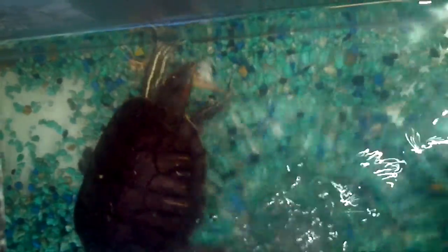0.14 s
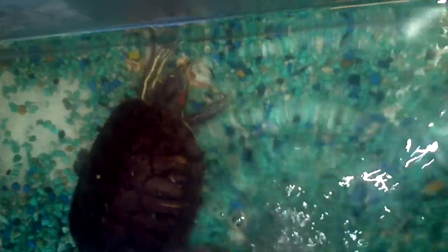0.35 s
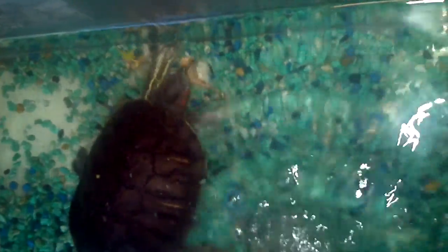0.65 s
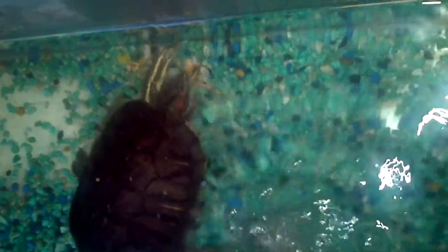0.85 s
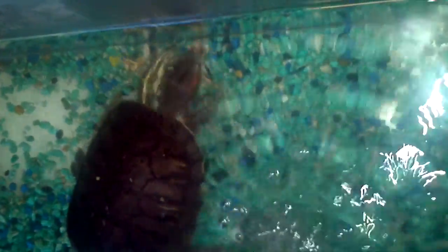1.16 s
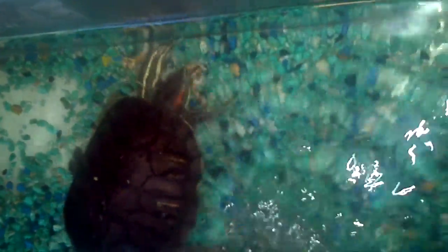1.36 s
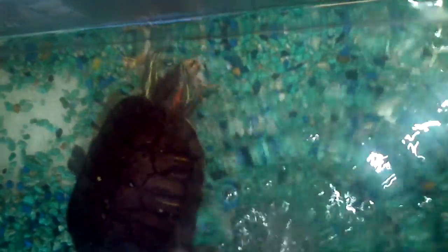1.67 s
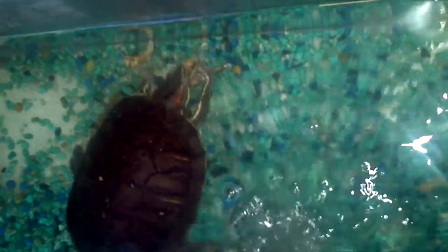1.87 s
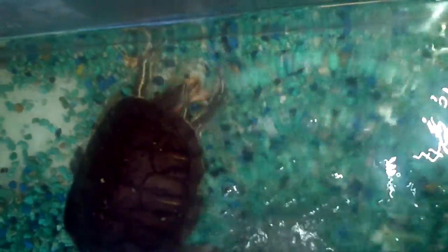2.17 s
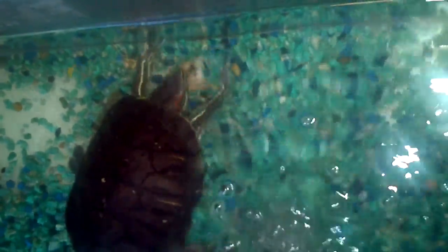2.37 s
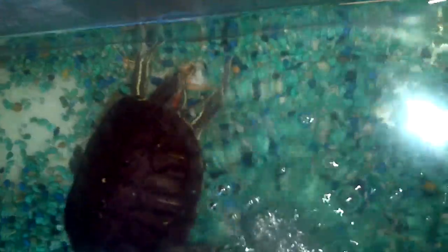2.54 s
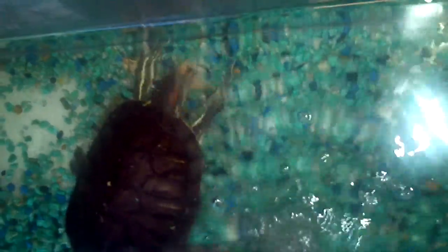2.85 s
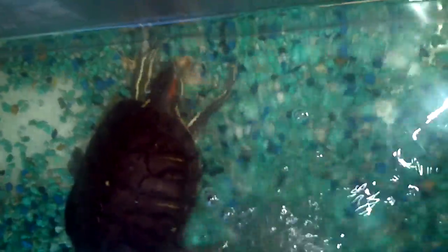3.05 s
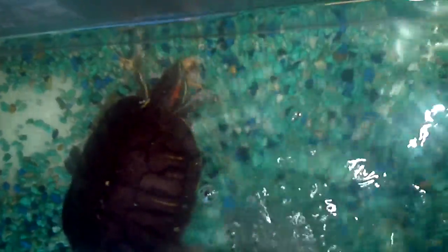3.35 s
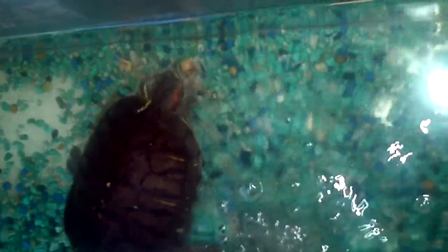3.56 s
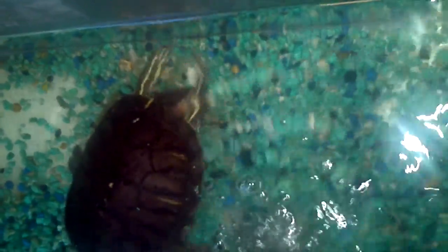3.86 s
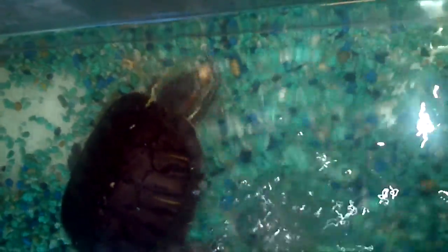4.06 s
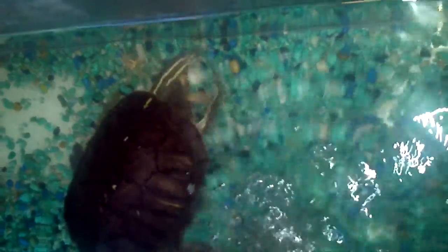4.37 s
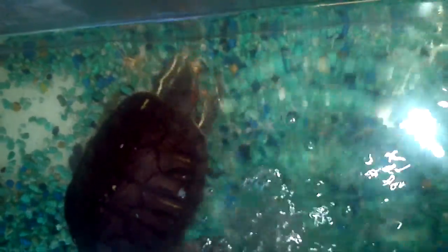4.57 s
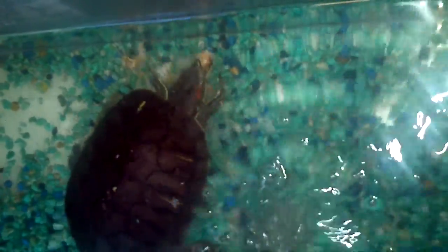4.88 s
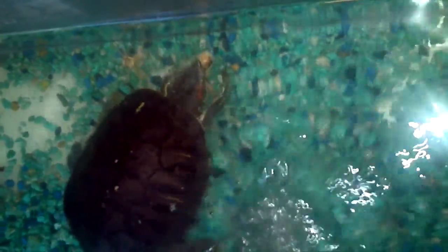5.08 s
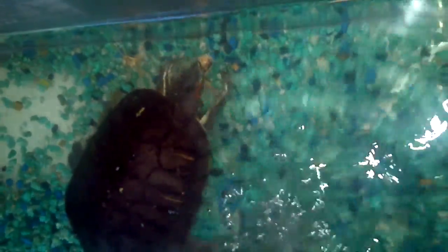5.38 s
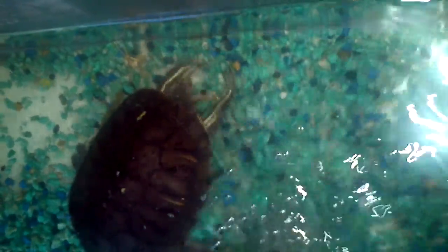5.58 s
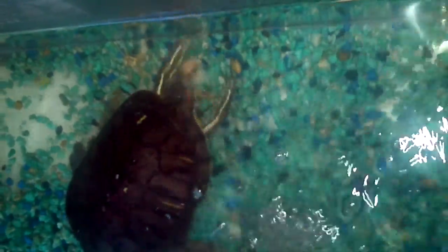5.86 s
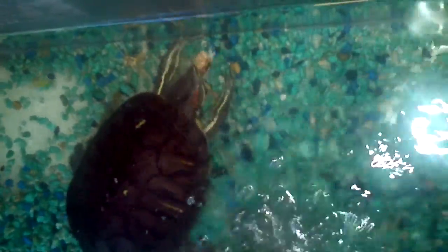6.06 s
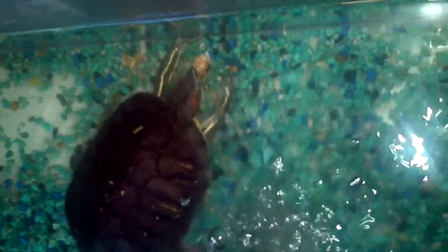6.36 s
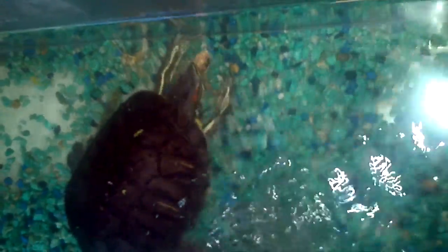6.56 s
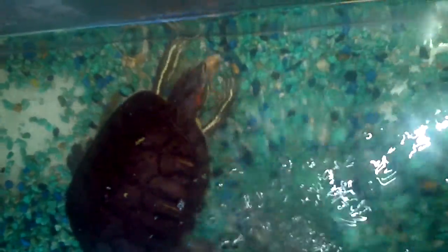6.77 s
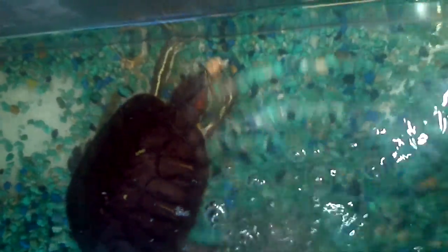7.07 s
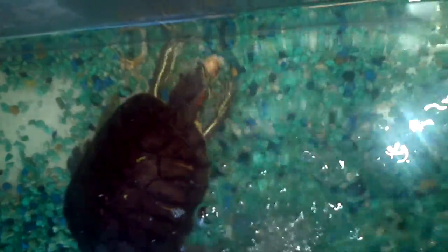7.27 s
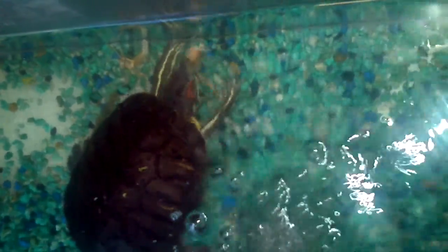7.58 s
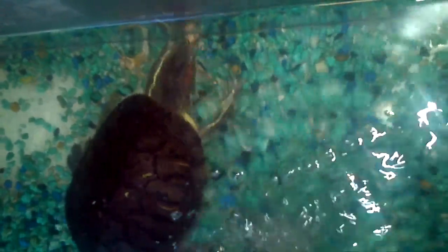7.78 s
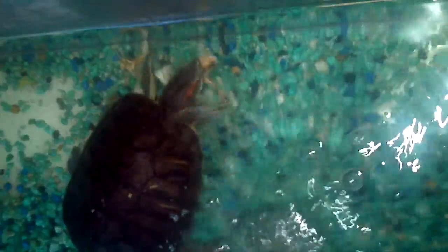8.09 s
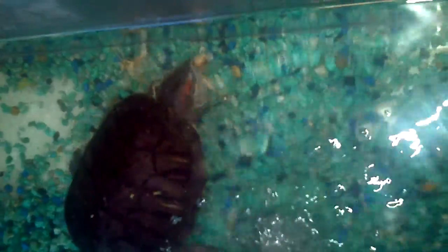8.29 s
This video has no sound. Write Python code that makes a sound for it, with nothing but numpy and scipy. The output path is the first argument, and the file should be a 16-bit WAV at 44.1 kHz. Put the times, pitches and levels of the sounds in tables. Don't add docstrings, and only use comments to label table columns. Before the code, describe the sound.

Aquarium water bubbles close up, with bright snapping pops, a fine crackling fizz, hollow gulps and a faint low pump hum underneath.

```python
import sys
import numpy as np
from scipy import signal
from scipy.fft import next_fast_len
from scipy.io import wavfile
from scipy.ndimage import uniform_filter1d

SR = 44100
rng = np.random.default_rng(int(sys.argv[2]) if len(sys.argv) > 2 else 0)


def log_audio(samples):
    frames = np.atleast_2d(samples).T
    limited = np.clip(frames, -1, 1)
    pcm = np.round(limited * 32767).astype(np.int16)
    wavfile.write(sys.argv[1], SR, pcm)


def ratio(d):
    e = np.asarray(d, float) / 20
    return 10 ** e


N = 371763

# frequency in Hz, level in dB.
FIZZ_SPECTRUM = [(2000, -15), (3500, -11.5), (4900, -12), (5700, -2.5), (7000, -4.5), (8200, -3.5),
                 (10000, -9), (11200, -6), (15500, -8)]
SPOT_DELAYS = [.00005, 0.000305, -0.00012]
EDGE_HZ = 15800


def evened(x):
    return x / np.sqrt(np.mean(x ** 2) + 1e-20)


def read(points, hz):
    f, value = np.transpose(points)
    return np.interp(np.log(hz + 1), np.log(f + 1), value)


def coloured(x, points):
    log_gain = np.log(ratio(read(points, abs(np.fft.fftfreq(4096, 1 / SR)))))
    taps = np.fft.ifft(np.exp(np.conj(signal.hilbert(log_gain)))).real[:1024]
    return signal.oaconvolve(x, taps[None], axes=1)[:, :N]


def add(mix, s, sound):
    part = mix[max(round(s * SR), 0):][:len(sound)]
    part += sound[:len(part)]


def sized(rows, hz, spread):
    return [(s, db, hz * (1 + spread * rng.standard_normal())) for s, db in rows]


def bubble(hz, cycles, glide, rise):
    u = np.arange(int(8 * cycles * SR / hz)) * hz / SR / cycles
    envelope = (1 - np.exp(-u / rise)) * np.exp(-u)
    wave = envelope * np.sin(2 * np.pi * cycles * u * (1 + glide * u))
    return wave / abs(wave).max()


def swarm(lo_hz, hi_hz, cycles, glide, per_s, spread_db, clump_db, clumps_per_s, count=24):
    slow = signal.butter(2, clumps_per_s, fs=SR, output="sos")
    clump = evened(signal.sosfilt(slow, rng.standard_normal((5, N))))
    clump = ratio(clump_db * np.minimum(0.5 * clump[-1] + 1.15 * clump[:-1], 1.6))
    level = ratio(spread_db * np.minimum(rng.exponential(1, N), 3.1))
    level = level * (rng.random(N) < per_s / SR)
    kind = rng.integers(0, count, N)
    spot = rng.integers(0, len(SPOT_DELAYS), N)
    out = np.zeros(len(SPOT_DELAYS) * N)
    for k, hz in enumerate(np.geomspace(lo_hz, hi_hz, count)):
        at = np.flatnonzero(level * (kind == k))
        wave = bubble(hz, cycles, glide, 0.16)
        where = (spot[at] * N + at)[:, None] + np.arange(len(wave))
        sounds = np.outer(level[at] * clump[k * len(clump) // count, at], wave)
        out += np.bincount(where.ravel(), sounds.ravel(), len(out))[:len(out)]
    return out.reshape(-1, N)


def flow(column):
    # time in seconds, fizz level in dB, churn level in dB.
    air_flow = [(0.0, -43, -44.5), (0.54, -39, -43), (1.17, -40.5, -45.5), (1.71, -43, -43.5),
                (2.84, -39.5, -43), (3.1, -41, -44), (6.2, -42.5, -45.5), (6.71, -38.5, -45.5),
                (7.18, -43, -42.5), (8.43, -39, -42.5)]
    rows = np.transpose(air_flow)
    return ratio(np.interp(np.arange(N) / SR, rows[0], rows[column]))


def hollow(x):
    # frequency in Hz, width in Hz, level in dB.
    air_modes = [(381.6, 48, 1.5), (430, 33, -4.5), (504.5, 14, -9.5), (675, 44.6, 1), (934, 72, -4.5),
                 (1100, 112, 2), (1700, 147, 7), (1816, 20, -3), (2050, 19, 2.5), (2326, 61, 7),
                 (2590, 20, 9.5)]
    out = 0
    for hz, width, db in air_modes:
        mode = signal.lfilter(*signal.iirpeak(hz, hz / width, SR), x)
        out = out + ratio(db) * mode * np.sqrt(40 / width)
    return out


def rumble():
    # frequency in Hz, level in dB.
    murmur_spectrum = [(30, -21), (70, -18.5), (100, -11.5), (160, -6), (230, -12.5), (400, -19.5)]
    noise = rng.standard_normal((3, N))
    opposed = 1.2 * np.array([[1], [-1]]) * noise[2]
    return ratio(-52.5) * evened(coloured(noise[:2] + opposed, murmur_spectrum))


def drone():
    noise = signal.lfilter(*signal.iirpeak(242, 9.0, SR), rng.standard_normal(N))
    noise = signal.lfilter(*signal.iirpeak(250, 3.0, SR), noise)
    shake = signal.hilbert(noise, next_fast_len(N))[:N]
    lead_rad = np.array([[.9], [0]])
    return ratio(-49.5) * evened((shake * np.exp(1j * lead_rad)).real)


def pump():
    # nominal frequency in Hz, level in dB, lead of the left port in radians.
    hum_lines = [(120, -65, 1.98), (180, -49.5, 2.15), (240, -53.5, 0.92), (300, -65.5, 0.4)]
    t, out = np.arange(N) / SR, np.zeros((2, N))
    for hz, db, lead in hum_lines:
        waver = sum(np.sin(2 * np.pi * (f * t + rng.random())) for f in np.geomspace(.3, 6, 8)) / 2
        phase = 2 * np.pi * round(hz / 60) * 60.03 * t + np.array([[lead], [0]])
        out += ratio(db + 4.5 + 0.31 * waver) * np.sin(phase)
    return out


def churn():
    # frequency in Hz, level in dB.
    water_spectrum = [(40, -39), (110, 12.5), (200, -19), (310, -20), (600, -9.5), (1200, -5), (2000, 2),
                      (3500, -69.5), (6000, 1.5)]
    drive = evened(swarm(330.2, 3492, 7.32, 0.0446, 600, 3.2, 1.55, 30.0, count=16))
    drive = drive + 0.047 * rng.standard_normal(drive.shape)
    resonant = ratio(-5.5) * evened(hollow(drive))
    plain = ratio(-14.5) * evened(coloured(drive, water_spectrum))
    return flow(column=2) * (resonant + plain)


def fizz():
    tiny = swarm(2280, 15260, 3.9, 0.026, 5000, 6.7, 3.46, 32)
    return flow(column=1) * ratio(-3.0) * evened(coloured(tiny, FIZZ_SPECTRUM))


def gulps():
    # start in seconds,
    # peak in dB, pitch in Hz.
    large, soft_large, more_others = [(.118, -31.5, 1340), (.716, -33.5, 390), (1.031, -31.5, 1837),
                                 (1.299, -31, 1750), (1.617, -26.5, 1780), (1.636, -30, 1664),
                                 (2.06, -23, 2080), (2.319, -34, 830), (2.503, -28.5, 420),
                                 (2.665, -32, 2050), (2.796, -31, 2590), (3.416, -31, 470),
                                 (3.464, -35.5, 1700), (3.643, -30, 1760), (3.881, -31.5, 1645),
                                 (4.971, -40, 1660), (5.58, -30.5, 2380), (6.084, -33, 1650),
                                 (6.826, -31.5, 1760), (7.04, -34, 1730), (7.151, -32, 428),
                                 (7.263, -36, 400)], [(0.1196, -41, 720), (0.336, -38, 430), (0.3364, -27.5, 599),
                                                (0.4147, -33.5, 1080), (0.6284, -36, 400),
                                                (0.462, -32, 442), (4.557, -37, 1690), (0.8398, -36, 740),
                                                (0.8407, -30.5, 1050), (0.8913, -30, 1100),
                                                (1.0475, -33, 775), (1.1766, -38, 418), (1.185, -35, 690),
                                                (1.2981, -33, 1130), (1.4452, -40.5, 432),
                                                (1.4458, -26.5, 640), (1.501, -36.5, 640),
                                                (1.6525, -37, 982), (1.8864, -36, 670), (3.385, -32, 1400),
                                                (2.1613, -30, 623), (2.5032, -31.5, 700),
                                                (2.7435, -38, 1140), (3.016, -43, 387), (3.1593, -35, 646),
                                                (3.2318, -40, 1140), (3.4184, -34, 984), (3.584, -34, 1100),
                                                (3.7706, -35, 715), (3.8799, -34, 1160), (4.0823, -34, 673),
                                                (4.3282, -45, 1064), (4.3274, -32, 460), (4.4021, -36, 790),
                                                (4.561, -23, 2380), (4.8109, -30, 985), (5.1087, -38, 1100),
                                                (5.253, -39, 1100), (5.4096, -36, 640), (5.8937, -35, 1143),
                                                (6.248, -38, 1110), (6.521, -35.5, 1270),
                                                (6.566, -37, 1100), (6.6898, -34.5, 1126),
                                                (6.7275, -39, 1070), (6.8287, -31, 1140),
                                                (6.8745, -39, 710), (6.9548, -41, 670), (7.1079, -38, 390),
                                                (7.1508, -31, 1000), (7.1838, -39, 1050),
                                                (7.6146, -43, 402), (7.6232, -39, 680),
                                                (7.6713, -30.5, 1085), (7.742, -38, 415),
                                                (7.742, -36, 1100), (7.8512, -39, 1074), (7.9663, -36, 394),
                                                (8.2341, -32.5, 650), (8.3061, -34, 430)], [(0.4337, -33, 1650), (0.5602, -37, 1760),
                                                               (0.7187, -31, 1760), (0.7573, -34, 1790),
                                                               (1.422, -32, 2300), (1.715, -31, 2500),
                                                               (1.784, -35, 1710), (2.1033, -29.5, 1860),
                                                               (2.195, -39, 1800), (2.2157, -36, 1750),
                                                               (2.2464, -35.5, 1760), (2.3052, -39, 1650),
                                                               (2.546, -29.5, 1460), (2.5937, -38, 1610),
                                                               (2.7298, -39.5, 1740), (3.292, -37, 1730),
                                                               (3.4086, -37, 1800), (4.2166, -38, 1820),
                                                               (4.275, -34, 1660), (4.662, -41, 1810),
                                                               (4.701, -36, 1840), (4.7275, -41, 1670),
                                                               (4.9355, -36.5, 1680), (5.3047, -34.5, 1730),
                                                               (5.5276, -31.5, 1710), (5.827, -39.5, 1670),
                                                               (6.127, -36.5, 1820), (6.1681, -40, 1660),
                                                               (6.1838, -35.5, 1730), (6.5093, -37, 1800),
                                                               (6.5472, -30.5, 1790), (6.5922, -40, 1570),
                                                               (6.941, -36, 1770), (7.081, -28.5, 2386),
                                                               (0.095, -34, 1470), (7.562, -33.5, 1830),
                                                               (7.6262, -36, 1660), (7.8163, -33, 2030),
                                                               (8.232, -37, 1650), (8.3088, -32, 1490)]
    # start in seconds, peak in dB.
    low_mode, mid_mode = [(.038, -29.5), (.28, -32), (.386, -39), (.442, -33), (.603, -31.5), (1.445, -62),
                          (1.792, -28), (1.995, -36.5), (2.16, -38), (2.438, -31.5), (3.55, -34.5),
                          (3.769, -34), (4.327, -27), (4.809, -35), (4.915, -26.5), (5.032, -35.5),
                          (5.196, -37), (5.401, -41), (5.675, -36.5), (6.044, -33), (6.872, -47),
                          (6.939, -38), (7.08, -36.5), (7.671, -21.5), (7.851, -35), (7.896, -35),
                          (7.962, -28), (8.052, -36.5), (8.113, -35), (8.305, -40)], [(.334, -34), (.631, -30), (.84, -45), (.883, -31),
                                             (1.048, -33), (1.187, -26), (1.357, -34.5), (2.231, -29.5),
                                             (2.341, -33), (2.626, -40), (2.841, -33), (3.016, -24),
                                             (3.049, -37), (3.232, -29.5), (3.822, -29), (4.557, -31.5),
                                             (4.753, -36), (5.228, -31), (5.301, -35), (5.496, -35),
                                             (6.154, -35), (6.296, -38), (6.476, -36.5), (6.69, -38),
                                             (6.759, -37), (7.374, -35.5), (7.533, -30.5), (7.774, -35),
                                             (8.211, -37.5)]
    spread = 0.032
    events = large + soft_large + more_others + sized(low_mode, 689, spread) + sized(mid_mode, 1080, spread)
    ring, knock = np.zeros((2, len(SPOT_DELAYS), N))
    for k, (s, db, hz) in enumerate(events):
        spot = k % len(SPOT_DELAYS)
        add(ring[spot], s, ratio(db - 8.5) * bubble(hz, 4.73 + hz / 300, 0.0323, 0.017))
        knock_gain = ratio(db + 1.5) * min(800 / hz, 1) ** 0.53
        add(knock[spot], s, knock_gain * bubble(1.34 * hz, 0.74, 0, 0.078))
    return ring + 0.6 * knock + ratio(10.0) * hollow(ring + knock)


def skins():
    # start in seconds, peak in dB, pitch in Hz, spray t60 in seconds.
    loudest = [(0.349, -14, 7950, 0.14), (.625, -17, 6650, 0.12), (0.791, -16, 8250, 0.024),
               (0.842, -15.5, 6830, 0.086), (0.878, -20.5, 6500, 0.13), (0.9845, -13, 7160, 0.055),
               (1.1676, -20.5, 6040, 0.11), (2.161, -16.5, 5470, 0.059), (2.238, -17.5, 6450, 0.082),
               (2.661, -14, 7200, 0.13), (2.727, -12, 7660, 0.022), (2.8052, -14, 7700, 0.075),
               (2.9858, -7.5, 7300, 0.065), (3.1352, -1.5, 7360, 0.0077), (3.4188, -14.5, 7800, 0.059),
               (3.5318, -14.5, 7200, 0.099), (3.6633, -17.5, 6200, 0.025), (3.908, -17.5, 6050, 0.12),
               (4.4996, -14, 6570, 0.013), (4.8099, -10, 6900, 0.0068), (4.989, -24, 6300, 0.035),
               (5.4013, -12.5, 8250, 0.15), (5.72, -12.5, 7000, 0.0068), (6.114, -19, 8240, 0.041),
               (6.233, -16.5, 8700, 0.021), (6.4072, -15.5, 7500, 0.032), (6.4788, -13.5, 8450, 0.038),
               (6.5266, -9, 6900, 0.0073), (7.1042, -14.5, 7470, 0.014), (7.672, -8.5, 7270, 0.024)]
    # start in seconds, peak in dB.
    snaps, soft = [(.021, -22.5), (.179, -45), (.1959, -44), (.2314, -48), (.2815, -23), (.5932, -22),
                   (.7158, -18.5), (.9309, -20.5), (1.1276, -14.5), (1.4077, -21), (1.6552, -22.5),
                   (1.705, -18), (1.9604, -20), (2.0999, -18), (2.2144, -21), (2.4118, -21.5),
                   (3.0906, -22), (3.3198, -19.5), (3.7233, -17), (3.9638, -20.5), (4.2632, -18.5),
                   (5.1367, -22), (5.4974, -22), (5.684, -18.5), (6.592, -21), (7.0544, -24.5),
                   (7.9628, -20), (8.0506, -18), (8.2062, -22), (8.3043, -50.5)], [(0.3055, -19), (0.332, -25), (0.4146, -26), (0.427, -21), (0.4534, -21),
                                  (1.004, -28), (1.1078, -34), (1.3395, -23.5), (1.3863, -22.5),
                                  (1.447, -23), (1.627, -23.5), (1.7705, -19), (1.792, -23), (1.842, -22),
                                  (2.5042, -22.5), (2.843, -18.5), (3.585, -21.5), (3.822, -28.5),
                                  (3.8437, -21), (4.327, -27), (4.8344, -23), (5.37, -27), (6.294, -21.5),
                                  (0.528, -22), (7.508, -25), (7.561, -30), (7.613, -25), (7.8223, -22.5),
                                  (8.028, -39), (8.1127, -27.5)]
    # start in seconds, peak in dB, pitch in Hz.
    strays, near_common, more_strays = [(0.0438, -23, 4600), (1.207, -22.5, 5330), (1.294, -21, 10340),
                               (2.0567, -35.5, 3920), (3.464, -22, 4100), (3.692, -20, 4200),
                               (4.029, -22, 10200), (4.442, -18.5, 8800), (4.772, -16.5, 9900),
                               (4.863, -20, 9500), (4.925, -27, 10400), (5.035, -11, 10200),
                               (5.101, -31, 4040), (5.1167, -20.5, 9800), (5.828, -23.5, 9000),
                               (5.941, -25, 4360), (6.013, -35, 4330), (6.295, -22, 3960),
                               (6.82, -29, 4000), (6.886, -20.5, 9400), (7.15, -19, 5200),
                               (7.395, -24.5, 5340), (7.7453, -20.5, 9200), (7.7787, -24.5, 10200),
                               (8.35, -27.5, 4030)], [(0.0408, -20.5, 7040), (0.1802, -21.5, 7300),
                                               (0.1934, -18.5, 6900), (0.2338, -21, 7000),
                                               (0.6278, -18.5, 7240), (0.648, -21, 7100),
                                               (0.7055, -24, 7850), (0.767, -47, 7000), (0.791, -33, 7100),
                                               (0.8804, -13.5, 7100), (0.934, -30, 7450),
                                               (1.0065, -23, 7000), (1.1089, -24, 7280), (1.265, -27, 7350),
                                               (1.408, -20.5, 7550), (1.685, -22, 6940),
                                               (2.2144, -19, 7360), (2.2313, -19, 7650), (2.44, -32, 7100),
                                               (2.454, -25, 6800), (2.4812, -27, 6400), (2.5846, -30, 7500),
                                               (2.7271, -19, 7260), (2.865, -22, 6960), (3.483, -23, 7300),
                                               (3.6652, -18, 6800), (3.937, -26, 7000), (3.999, -26, 6870),
                                               (4.035, -27, 7900), (4.1834, -22.5, 7000),
                                               (4.3423, -22, 7060), (4.362, -26, 7550), (4.5967, -23, 7580),
                                               (4.835, -23, 7400), (5.032, -15, 7300), (5.142, -21, 6750),
                                               (5.3206, -27, 6910), (5.422, -23, 6900), (5.513, -27, 7010),
                                               (5.6693, -27, 6800), (5.72, -19, 7100), (5.8834, -28, 7340),
                                               (6.086, -24.5, 7300), (6.162, -26, 7050),
                                               (6.2327, -22, 7450), (6.321, -28, 7140),
                                               (6.409, -16.5, 7700), (6.528, -31, 7350),
                                               (6.677, -24.5, 6650), (6.753, -26.5, 8200),
                                               (6.8221, -18, 7000), (6.8804, -33.5, 7450),
                                               (6.937, -25, 6960), (7.0594, -22, 6900), (7.3974, -26, 6850),
                                               (7.4595, -30, 7340), (7.846, -23, 6960), (7.8823, -24, 7070),
                                               (7.8955, -26, 7040), (8.3048, -21, 7700)], [(0.0423, -29, 12950), (0.106, -20.5, 13400),
                                                              (0.375, -29, 4570), (0.6172, -19, 13300),
                                                              (0.7922, -24, 9900), (0.8784, -26, 4540),
                                                              (1.1668, -23.5, 9400), (1.186, -32.5, 4060),
                                                              (1.295, -12, 9500), (1.293, -28, 4020),
                                                              (1.496, -25, 13400), (1.967, -27.5, 4140),
                                                              (2.2376, -26, 4530), (2.462, -24, 4500),
                                                              (2.647, -31.5, 4060), (2.7045, -29, 5110),
                                                              (2.706, -21, 13040), (2.901, -21, 9500),
                                                              (2.9225, -30.5, 4100), (2.928, -24, 9700),
                                                              (2.9894, -18.5, 10100), (3.6292, -29, 4100),
                                                              (3.911, -22, 10000), (3.9644, -25.5, 4900),
                                                              (3.971, -22, 13060), (4.15, -32.5, 4500),
                                                              (4.1753, -31, 4200), (4.7754, -20, 10650),
                                                              (4.9273, -38, 10300), (4.9881, -26, 3980),
                                                              (4.9963, -21, 9620), (5.0321, -30, 3780),
                                                              (5.038, -26, 10400), (5.139, -23, 10100),
                                                              (5.3997, -20.5, 4330), (5.497, -28, 3930),
                                                              (5.6656, -34, 3700), (5.709, -31, 9700),
                                                              (5.8465, -30.5, 4000), (6.008, -31, 4240),
                                                              (6.01, -20, 12800), (6.028, -26.5, 4260),
                                                              (6.1173, -27, 4500), (6.2287, -41, 3900),
                                                              (6.5934, -23, 13220), (6.593, -25.5, 10700),
                                                              (6.636, -26, 13400), (6.637, -21.5, 10700),
                                                              (6.822, -26, 4020), (6.889, -25, 12740),
                                                              (7.523, -21.5, 13180), (7.5595, -22.5, 4920),
                                                              (7.7346, -28.5, 4400), (7.8195, -27, 3550),
                                                              (8.0278, -24, 5230), (8.115, -18.5, 12900),
                                                              (8.1365, -28.5, 4080)]
    common_hz, common_spread, common_t60_s = 7070, 0.098, 0.067
    faint_per_s, faint_db, faint_spread_db, clear_s = 12, -37, 3, .035
    clear = snaps + soft + [row[:2] for row in loudest + strays + near_common + more_strays]
    beat = np.arange(0, N / SR, 1 / faint_per_s)
    chance = rng.standard_normal((200, 2))[:len(beat)]
    times = beat + 0.33 / faint_per_s * chance[:, 0]
    free = abs(times[:, None] - np.transpose(clear)[0]).min(1) > clear_s
    levels_db = np.where(free, faint_db + faint_spread_db * chance[:, 1], -90)
    common = sized(snaps + soft + list(zip(times, levels_db)), common_hz, common_spread)
    return loudest + [(*row, common_t60_s) for row in strays + near_common + more_strays + common]


def pops():
    rings, spray = np.zeros((2, len(SPOT_DELAYS), N))
    t, noise = np.arange(3000) / SR, rng.standard_normal((340, 3000))
    swell = 1 - np.exp(-t / 0.00019)
    for k, (s, db, hz, t60) in enumerate(skins()):
        spot = k % len(SPOT_DELAYS)
        fade = swell * ratio(db - 60 * t / np.clip(t60, .008, .075))
        near = evened(signal.lfilter(*signal.iirpeak(hz, 4.5, SR), noise[k]))
        burst = 0.89 * np.sqrt(swell) * ratio(db - 60 * t / 0.0027)
        add(rings[spot], s, ratio(db + 4.0) * bubble(hz, 2.97, 0.00047, 0.25))
        add(rings[spot], s, ratio(-10.5) * fade * near)
        add(spray[spot], s, ratio(-13.0) * (fade + burst))
    return rings + spray * evened(coloured(rng.standard_normal(spray.shape), FIZZ_SPECTRUM))


def tank(x, wet_db):
    # frequency in Hz, t60 in seconds.
    decay = [(300, 0.19), (1500, 0.054), (5000, 0.035), (9000, 0.038), (15000, 0.014)]
    length = SR // 8
    taps = np.zeros((len(x), 3, length))
    jitter = rng.integers(0, 20, (len(x), 3, (length - 61) // 20))
    at = np.arange(60, length - 20, 20) + jitter
    np.put_along_axis(taps, at, rng.choice([-1., 1.], at.shape), 2)
    hz, t, z = signal.stft(taps, SR, nperseg=256)
    own = (hz / (hz + 1500))[:, None] ** 1.25
    z = np.sqrt(1 - own ** 2) * z[:, 2:] + own * z[:, :2]
    z = z * ratio(-60 * t / read(decay, hz)[:, None])
    tail = signal.istft(z, SR, nperseg=256)[1]
    tail = signal.lfilter(*signal.butter(1, 900, "high", fs=SR), tail / np.linalg.norm(tail[0, 0]))
    k = np.arange(tail.shape[2]) - 16
    direct = np.array([[np.sinc(k), 0.72 * np.sinc(k - late_s * SR)] for late_s in SPOT_DELAYS])
    paths = direct + ratio(wet_db) * tail
    return signal.oaconvolve(x[:, None], paths, axes=2)[:, :, 16:N + 16].sum(0)


def widened(x):
    late = np.pad(x[::-1], ((0, 0), (15, 0)))[:, :N]
    return signal.lfilter(*signal.butter(2, 110, "high", fs=SR), x - 1.36 * late)


def scene():
    bubbles = pops() + gulps() + fizz() + churn()
    return widened(tank(bubbles, -4.5)) * ratio(-7.0) + pump() + drone() + rumble()


def levelled(x, knee_db, share, db_per_s):
    power_db = 10 * np.log10(abs(uniform_filter1d((x ** 2).mean(0), size=300)) + 1e-12)
    fall = np.arange(N) * db_per_s / SR
    over_db = np.maximum.accumulate(share * np.maximum(power_db - knee_db, 0) + fall) - fall
    return x / ratio(uniform_filter1d(over_db, size=1500, origin=749))


def thrifty(x, under_db, faint_db, grain_db, jump):
    mid_side = np.array([x[0] + x[1], x[0] - x[1]]) / 2
    z = signal.stft(mid_side, window="cosine", nperseg=2048, noverlap=1024)[2][:, :1024]
    power = (abs(z) ** 2).reshape(2, 64, 16, -1).mean(2)
    band_hz = (np.arange(64)[:, None] + .5) * SR / 128
    short = (np.diff(x[0], prepend=0)[:N // 128 * 128] ** 2).reshape(-1, 128).mean(1)
    sudden = short > jump * uniform_filter1d(short, size=9, origin=4)
    attack = np.minimum(12 * uniform_filter1d(1. * sudden, size=5, origin=1), 1)
    attack = np.interp(np.arange(N) / 128, np.arange(len(short)), attack)
    loudest = power[:, 15:25].max(0).mean(0)
    luck = ratio(3 * rng.standard_normal(power.shape)) ** 2
    extra_db = np.interp(band_hz, [2450, 2800, 3400, 3900, 9500, 11000], [0.3, 9, 9, 1.5, 1.5, 2.5])
    masked = power.max(0) * ratio(under_db + extra_db) ** 2
    weak = power < luck * np.maximum(masked, loudest * ratio(faint_db) ** 2)
    dropped = np.repeat(weak & (band_hz > 1400) | (band_hz > EDGE_HZ), 16, 1)
    grain = np.repeat(power.max(0) ** .5 * ratio(grain_db) * weak, 16, 1)
    grain = grain * np.exp(2j * np.pi * rng.random(z.shape))
    parts = np.pad(np.array([z * ~dropped, (z + grain) * dropped]), ((0, 0), (0, 0), (0, 1), (0, 0)))
    kept, lost = signal.istft(parts, window="cosine", nperseg=2048, noverlap=1024)[1][:, :, :N]
    mid, side = kept + attack * lost
    return np.array([mid + side, mid - side])


def band_limit(x):
    return signal.sosfilt(signal.butter(12, 16980, fs=SR, output="sos"), x)


def record(dry):
    edge = signal.firwin(101, EDGE_HZ, window=("kaiser", 2.2), fs=SR)
    rolled = signal.oaconvolve(levelled(dry, -24.0, 0.4, 2.14), edge[None], "same")
    finished = thrifty(rolled, under_db=-10.5, faint_db=-20, grain_db=-18.0, jump=4.8)
    return band_limit(finished)


dry = scene()
out = record(dry)
log_audio(out)
```